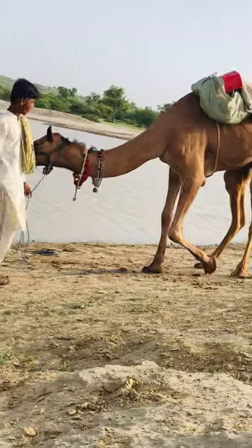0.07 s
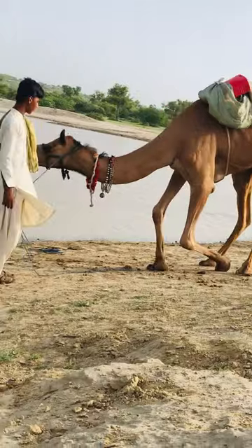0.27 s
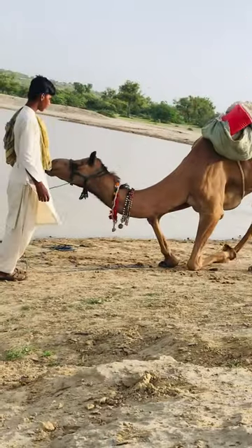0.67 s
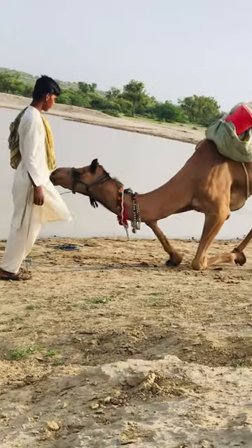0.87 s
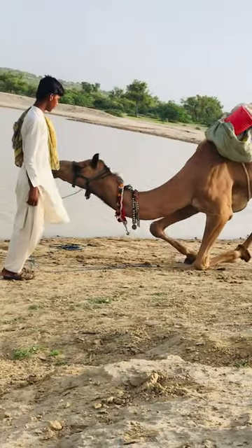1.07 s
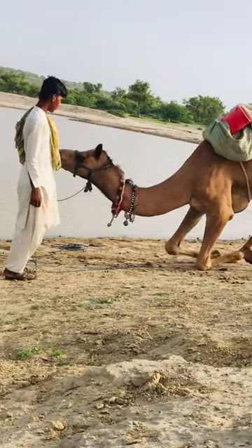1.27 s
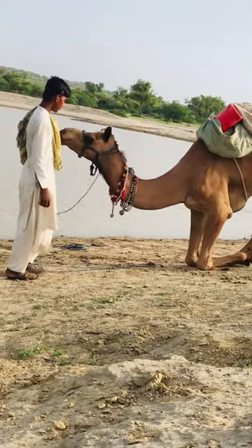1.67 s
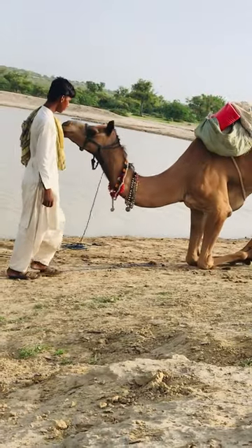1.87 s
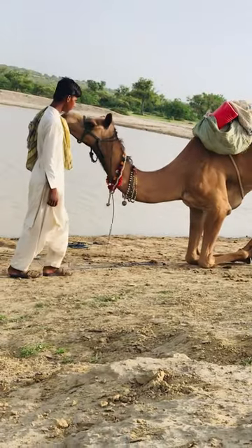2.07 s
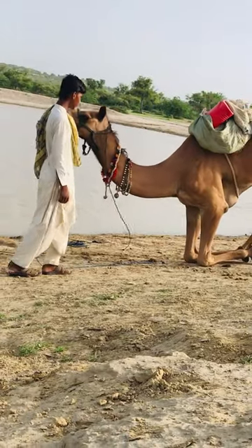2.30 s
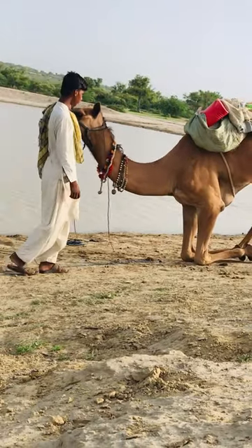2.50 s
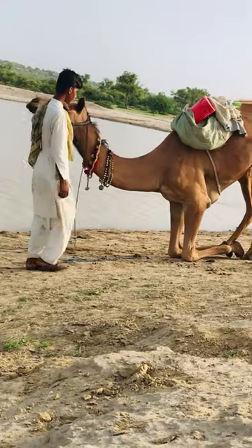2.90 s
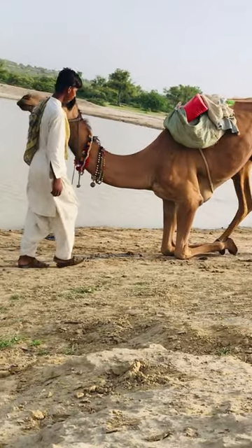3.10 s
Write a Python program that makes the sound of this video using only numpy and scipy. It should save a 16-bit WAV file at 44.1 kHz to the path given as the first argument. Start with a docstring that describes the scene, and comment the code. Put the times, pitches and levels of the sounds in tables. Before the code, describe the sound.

Gusty wind rumbles and thumps on the microphone over a camel's faintly clicking harness.

```python
"""Uneven wind buffets a microphone on a riverbank: eddies thump over a low rumble.
A camel kneels in the dirt with a soft, gritty rustle that comes and goes.
Its harness bell rings once at the start and dies away; the tack clicks.
Birds whistle faintly far off."""
import sys
import numpy as np
from scipy import signal
from scipy.fft import rfft, irfft
from scipy.io import wavfile
from scipy.ndimage import uniform_filter1d

SR = 44100
rng = np.random.default_rng(int(sys.argv[2]) if len(sys.argv) > 2 else 0)


def file_out(sig):
    """Save sig as 16-bit WAV at sys.argv[1]."""
    # one column per channel
    cols = np.atleast_2d(sig).T
    # limit, then scale
    lim = np.clip(cols, -1, 1)
    pcm = np.round(lim * 32767).astype(np.int16)
    wavfile.write(sys.argv[1], SR, pcm)


N = 143325


def amp(db):
    """Decibels to gain."""
    return 10 ** (np.asarray(db) / 20)


def unit_rms(x):
    """Scale to rms 1."""
    return x / np.sqrt(np.mean(x ** 2) + 1e-20)


def add(mix, start_s, sound):
    """Mix a sound in at start_s."""
    part = mix[max(round(start_s * SR), 0):][:len(sound)]
    part += sound[:len(part)]


def curve(rows, column=1):
    """Table column interpolated to every sample."""
    rows = np.array(rows)
    return np.interp(np.arange(N) / SR, rows[:, 0], rows[:, column])


def noise(gain, size):
    """Random-phase noise, rms 1, spectrum gain(hz)."""
    hz = np.fft.rfftfreq(size, 1 / SR) + 1
    return unit_rms(irfft(gain(hz) * np.exp(2j * np.pi * rng.random(len(hz))), size))


def colour(points, tilt_db_oct=0):
    """Tilted spectrum through (f/Hz, level/dB) points."""
    points_hz, db = np.transpose(points)
    return lambda hz: amp(np.interp(np.log(hz), np.log(points_hz), db) + tilt_db_oct * np.log2(hz))


def wander(rate_hz, size):
    """Random drift up to about rate_hz, rms 1."""
    return noise(lambda hz: np.exp(-(hz / rate_hz) ** 2), size)


def levelled(x, width, floor=1e-9):
    """Divide by the local rms over width points: swells go, fast lumps stay."""
    power = uniform_filter1d(uniform_filter1d(abs(x) ** 2, width), width)
    return x / np.sqrt(abs(power) + floor)


def grains(hz, cycles, per_s, spread_db):
    """Random train of wavelets of one pitch and uneven size."""
    turns = np.arange(-1000, 1000) / SR * hz
    wavelet = np.exp(-(2 * turns / cycles) ** 2) * np.sin(2 * np.pi * turns)
    sizes = amp(spread_db * np.minimum(rng.exponential(1, N), 4)) * rng.choice([-1, 1], N)
    hits = rng.random(N) < per_s / SR
    return signal.oaconvolve(sizes * hits, wavelet, "same")


def eddy_band(low_hz, top_hz, low_poles=6.7, top_poles=3.385):
    """Eddy spectrum: flat between two steep edges."""
    finest_eddy_hz = 2.61 * top_hz
    edges = lambda hz: (1 + (low_hz / hz) ** (2 * low_poles)) * (1 + (hz / top_hz) ** (2 * top_poles))
    return lambda hz: np.exp(-(hz / finest_eddy_hz) ** 3) / np.sqrt(edges(hz))


# Rumble spectrum: f/Hz, relative level/dB
RUMBLE_SPECTRUM = [(15, -64), (25, -34), (35, -14), (50, -1), (72, 0.5), (100, -7), (140, -12), (220, -29),
                   (500, -96)]
# Wind strength: t/s, rumble level/dB, small-eddy flow level/dB
WIND_LEVELS = [(0, -34.5, -58.5), (0.18, -39.5, -49.5), (0.23, -20, -26.5), (0.29, -25, -36),
               (0.36, -41, -69), (0.49, -28, -35), (0.56, -34, -47.5), (0.68, -27.5, -46.5),
               (0.78, -18.5, -23.5), (0.9, -39.5, -46), (1.0, -30.5, -27.5), (1.17, -33.5, -40.5),
               (1.28, -26, -32), (1.35, -39, -34.5), (1.59, -29, -31), (1.66, -40, -48.5),
               (1.73, -23.5, -31), (1.83, -28, -32), (1.97, -44.5, -49.5), (2.06, -33, -25),
               (2.13, -46, -52), (2.2, -27, -38), (2.29, -42, -55), (2.38, -25.5, -25), (2.5, -31.5, -49.5),
               (2.62, -25.5, -27), (2.78, -32.5, -35.5), (2.86, -36.5, -37), (2.96, -23, -52.5),
               (3.04, -46, -41), (3.1, -31.5, -52), (3.17, -51.5, -58), (3.25, -60, -36)]


def rumble():
    """Large slow eddies press on the microphone."""
    pressure = levelled(noise(colour(RUMBLE_SPECTRUM), N), width=int(0.12 * SR))
    return pressure * amp(curve(WIND_LEVELS, column=1))


def flutter(low_hz=97, top_hz=210.4, reference_db=-32, oct_per_db=0.04, uneven_db=5, gain_db=-4):
    """Small eddies come in uneven flurries and brighten as the flow grows."""
    flow_db = curve(WIND_LEVELS, column=2) + uneven_db * wander(rate_hz=51, size=N)
    shift_oct = np.clip(oct_per_db * (flow_db - reference_db), -1, 1)
    out = np.zeros(N)
    for band_oct in (-1, -0.5, 0, 0.5, 1):
        share = np.maximum(1 - 2 * abs(shift_oct - band_oct), 0)
        eddies = noise(eddy_band(low_hz, top_hz * 2 ** band_oct), N)
        out += np.sqrt(share) * levelled(eddies, width=int(0.075 * SR))
    return out * amp(flow_db + gain_db)


def eddy_snaps(centre_hz=268.5, per_s=45, gain_db=2.5):
    """Single small eddies flick past, about a cycle each; lower ones are stronger."""
    pitches_hz = centre_hz * 2 ** np.linspace(-0.7, 0.7, 5)
    train = sum(grains(hz, cycles=0.84, per_s=per_s / len(pitches_hz), spread_db=2)
                * (centre_hz / hz) ** 2.97 for hz in pitches_hz)
    return train * amp(curve(WIND_LEVELS, column=2) + gain_db)


# Distant wash spectrum: f/Hz, relative level/dB
WASH_SPECTRUM = [(100, -0.5), (600, 16), (1400, 7.5), (3000, 1), (6000, -10), (10500, -25.5), (13500, 7),
                 (15700, -20)]


def distant_wash(level_db=-70.5):
    """Faint steady background hiss."""
    return noise(colour(WASH_SPECTRUM), N) * amp(level_db)


# Rustle spectrum: f/Hz, relative level/dB
RUSTLE_SPECTRUM = [(300, -3.5), (1000, 8.5), (2000, 5), (3300, 1.5), (5000, 1), (6200, 1), (7300, -4),
                   (9000, -0.5), (10500, -5.5), (13500, 4.5), (14600, 1.5), (15700, -8)]
# Rustle envelope: t/s, relative level/dB
RUSTLE_LEVELS = [(0.1, -64.5), (0.19, -73), (0.225, -54), (0.27, -67.5), (0.3, -60), (0.41, -68.5),
                 (0.53, -59), (0.6, -64.5), (0.74, -71.5), (0.85, -67), (0.93, -56.5), (1.06, -63.5),
                 (1.12, -59), (1.25, -61), (1.31, -64.5), (1.38, -60.5), (1.45, -66), (1.51, -61),
                 (1.74, -70.5), (1.785, -64), (1.85, -75.5), (1.96, -69.5), (2.04, -57), (2.08, -71),
                 (2.2, -55), (2.3, -55), (2.38, -73.5), (2.8, -72.5), (3.0, -64), (3.1, -58.5),
                 (3.17, -69.5), (3.25, -71.5)]


def rustle(gain_db=2, grain_db=2, patch_db=1.8, patch_hz=26):
    """Patchy hiss, as of dust and cloth; each band swells on its own."""
    level_db = curve(RUSTLE_LEVELS) + gain_db + grain_db * wander(rate_hz=140, size=N)
    spectrum = rfft(noise(colour(RUSTLE_SPECTRUM), N))
    band = (10 * np.sqrt(np.arange(len(spectrum)) / len(spectrum))).astype(int)
    hiss = sum(irfft(spectrum * (band == k), N) * amp(patch_db * wander(patch_hz, N))
               for k in range(band.max()))
    return hiss * amp(level_db)


def grit(per_s=700, gain_db=-64):
    """Grains of dry dirt crackle, following the rustle's level."""
    pitches_hz = np.geomspace(2600, 13000, 9)
    rustle_db = curve(RUSTLE_LEVELS)
    train = sum(grains(hz, cycles=1.8, per_s=per_s / len(pitches_hz), spread_db=2.5)
                * np.sqrt(hz / pitches_hz[-1]) for hz in pitches_hz)
    return train * amp(gain_db + rustle_db - rustle_db.mean())


# Contact spectrum of clapper and tack: f/Hz, relative level/dB
CONTACT_SPECTRUM = [(500, 27), (1500, 10.5), (5500, 7), (8000, 10), (10500, -3), (13500, 4), (16000, -9)]
# Bell modes: f/Hz, relative level/dB, free t60/s
BELL_MODES = [(1254, -43, .25), (3297, -55, .35), (3521, -49, .25), (6139, -43, .19), (6198, -49, .2),
              (7967, -64, .2), (9012, -57, .3), (9728, -52, .19), (12039, -54, .2), (12690, -50, .19),
              (12778, -45, .19), (13262, -47, .12), (13395, -53, .2), (14473, -41, .19)]


def harness_bell(start_s=0.0016, rise_s=0.001, free_s=0.075, damping_db_per_s=420, gain_db=1.5):
    """A bell rings, its loose clapper rattling, until the harness damps its upper modes."""
    out, t = np.zeros(N), np.arange(SR) / SR
    chatter_db, chatter_s = -52 + 6 * wander(rate_hz=160, size=SR), 0.014
    ring = noise(colour(CONTACT_SPECTRUM), SR) * amp(chatter_db) * np.exp(-t / chatter_s)
    for hz, db, t60_s in BELL_MODES:
        rattle = 1 + 0.1 * wander(rate_hz=70.5, size=SR)
        damping_db = damping_db_per_s * np.maximum(t - free_s, 0) * (hz > BELL_MODES[0][0])
        envelope = amp(db - 60 * t / t60_s - damping_db)
        ring += envelope * rattle * np.sin(2 * np.pi * (hz * t + rng.random()))
    add(out, start_s, amp(gain_db) * ring * np.minimum(t / rise_s, 1))
    return out


# Bird calls: t/s, length/s, start f/Hz, end f/Hz, mid-call level/dB
BIRD_CALLS = [(.005, 0.099, 3720, 4800, -68.5), (0.077, 0.14, 1310, 1395, -64.5),
              (0.177, 0.075, 1238, 1260, -54.5), (0.318, 0.026, 1190, 1320, -57),
              (0.337, 0.073, 1250, 1424, -60), (1.108, 0.0087, 910, 1040, -41.5),
              (1.613, 0.0064, 1770, 2140, -52.5), (1.948, 0.11, 6000, 6200, -89),
              (2.128, 0.076, 5050, 5300, -74), (2.41, 0.088, 4650, 5470, -69.5),
              (2.492, 0.013, 1780, 1640, -58.5), (2.569, 0.0117, 4800, 4470, -67),
              (2.674, 0.071, 1840, 1990, -69.5), (2.765, .04, 2780, 2200, -74),
              (2.827, 0.019, 3750, 4100, -67), (2.844, 0.11, 4040, 4680, -68),
              (3.143, 0.045, 2650, 2300, -69.5)]


def birds(waver=0.003, flicker_db=3.5):
    """Far-off whistles and chirps: thin gliding tones that waver and flicker."""
    out = np.zeros(N)
    for start_s, length_s, from_hz, to_hz, db in BIRD_CALLS:
        progress = np.arange(0, length_s, 1 / SR) / length_s
        hz = from_hz + (to_hz - from_hz) * progress
        hz *= 1 + waver * wander(rate_hz=260, size=SR)[:len(hz)]
        level_db = db + flicker_db * wander(rate_hz=140, size=SR)[:len(hz)]
        tone = np.sqrt(2) * np.sin(2 * np.pi * np.cumsum(hz) / SR)
        add(out, start_s, amp(level_db) * np.sin(np.pi * progress) * tone)
    return out


# Tack clicks: t/s, peak level/dB, tilt/(dB/oct)
TACK_CLICKS = [(0.125, -40, -3), (.531, -33, -4.5), (0.547, -39, -1.5), (.588, -33, -2), (0.652, -32, -2.5),
               (0.682, -35, -4), (.772, -44, 4), (0.7872, -32, 12), (0.788, -45, 13), (0.8143, -31.5, 17.5),
               (1.183, -32.5, 17), (1.4, -33, 13.5), (2.494, -38.5, 24.5), (2.702, -44.5, 1.5),
               (2.978, -39.5, 1), (3.003, -53, -10)]


def tack(rise_s=0.00017, decay_s=0.001, ring_s=0.011, ring_db=-25.5):
    """Beads and buckles tick, each with a brief ring."""
    out, t = np.zeros(N), np.arange(SR // 20) / SR
    envelope = np.minimum(t / rise_s, 1) * (np.exp(-t / decay_s) + amp(ring_db) * np.exp(-t / ring_s))
    for start_s, db, tilt_db_oct in TACK_CLICKS:
        tick = envelope * noise(colour(CONTACT_SPECTRUM, tilt_db_oct), len(t))
        add(out, start_s, amp(db) * tick / abs(tick).max())
    return out


# Strong eddies: t/s, length/s, relative level/dB, body's upper edge f/Hz
STRONG_EDDIES = [(0.216, 0.028, -31.5, 338), (0.275, 0.012, -22.5, 315), (0.414, 0.01, -37, 274),
                 (0.648, 0.018, -25.5, 287), (0.714, 0.021, -22.5, 287), (0.746, 0.011, -14.5, 222),
                 (0.772, 0.019, -23.5, 275), (0.843, 0.041, -31, 410), (0.983, 0.011, -21.5, 680),
                 (0.998, 0.0067, -26.5, 350), (1.01, 0.015, -29, 460), (1.066, 0.011, -29, 420),
                 (1.135, 0.015, -32, 370), (1.207, 0.014, -25, 386), (1.28, 0.019, -23, 414),
                 (1.387, 0.0068, -20, 253), (1.43, 0.02, -48, 312), (1.503, 0.02, -29, 370),
                 (1.546, 0.014, -24.5, 357), (1.576, 0.03, -20, 306), (1.642, 0.012, -31.5, 363),
                 (1.701, 0.0098, -16.5, 342), (1.72, 0.015, -21, 370), (1.75, 0.017, -22.5, 357),
                 (1.806, 0.0078, -26, 354), (1.835, 0.012, -26.5, 406), (2.046, 0.018, -28, 335),
                 (2.072, 0.027, -34.5, 392), (2.169, 0.015, -17, 396), (2.357, 0.013, -14, 475),
                 (2.458, 0.012, -34, 400), (2.543, 0.012, -18.5, 367), (2.603, 0.0089, -23, 320),
                 (2.645, 0.015, -16, 319), (2.658, 0.016, -19, 444), (2.68, 0.027, -23, 375),
                 (2.761, 0.03, -31.5, 314), (2.787, 0.019, -25.5, 344), (2.863, 0.017, -34.5, 430),
                 (2.936, 0.015, -33.5, 400), (3.086, 0.012, -33.5, 323)]


def buffets(low_hz=97.2, rise_s=0.0013, fall_s=0.0053, tilt_db_oct=-3.5, core_db=-4, gain_db=-1.5):
    """Strong eddies thump the microphone: a dull random body around one sharp pressure swing."""
    out, size, lead_s = np.zeros(N), 4096, 0.02
    t = np.arange(size) / SR - lead_s
    hz = np.fft.rfftfreq(size, 1 / SR) + 1
    for start_s, length_s, db, top_hz in STRONG_EDDIES:
        envelope = np.exp(-(np.minimum(t, 0) / rise_s) ** 2 - (np.maximum(t - length_s, 0) / fall_s) ** 2)
        spectrum = rfft(envelope * rng.standard_normal(size))
        spectrum = levelled(spectrum, width=int(1 / length_s / hz[1]) + 2, floor=1e-12)
        body = irfft(spectrum * eddy_band(low_hz, top_hz)(hz) * amp(tilt_db_oct * np.log2(hz)), size)
        core_s = lead_s + length_s * (0.45 + 0.2083 * rng.uniform(-1.012, 1))
        core_phase = 2 * np.pi * (rng.random() - hz * core_s)
        core = irfft(eddy_band(low_hz, 1.244 * top_hz)(hz) * np.exp(1j * core_phase), size)
        thump = unit_rms(unit_rms(body) + amp(core_db) * unit_rms(core))
        add(out, start_s - lead_s, thump * np.sqrt(length_s * SR / size) * amp(db + gain_db))
    return out


def scene():
    """Wind at the microphone over camel and riverbank, mono."""
    return (rumble() + flutter() + eddy_snaps() + distant_wash() + rustle() + grit()
            + harness_bell() + birds() + tack() + buffets())[None]


def record(dry):
    """Steep low-pass band limit."""
    cutoff_hz = 15700
    lowpass = signal.firwin(511, cutoff_hz, window=("kaiser", 9), fs=SR)
    return signal.oaconvolve(dry, lowpass[None], "same")


dry = scene()
out = record(dry)
file_out(out)
```